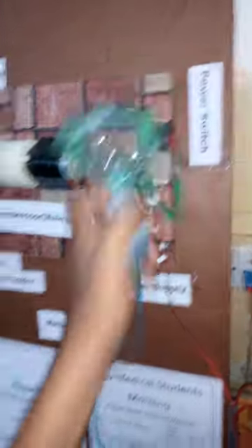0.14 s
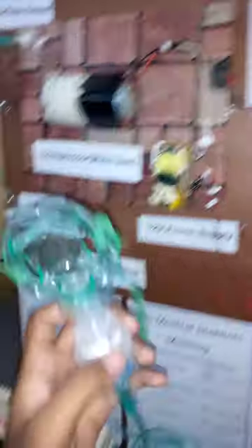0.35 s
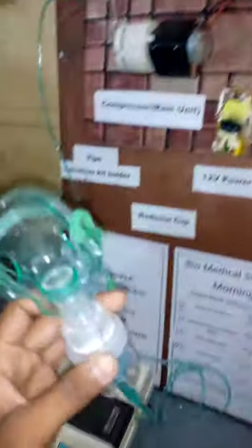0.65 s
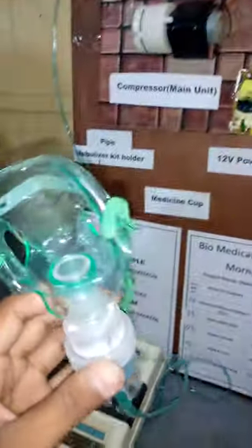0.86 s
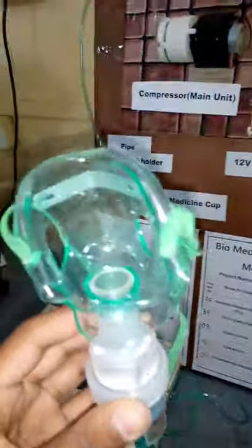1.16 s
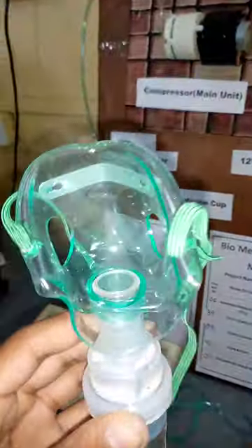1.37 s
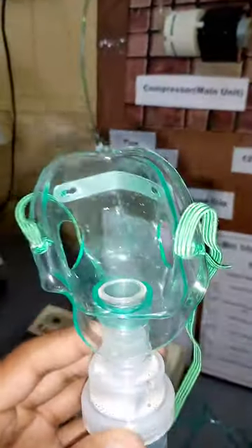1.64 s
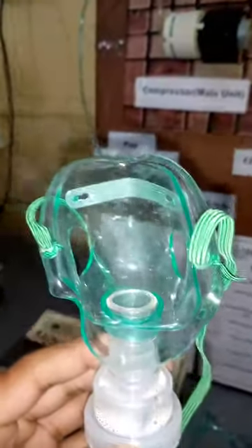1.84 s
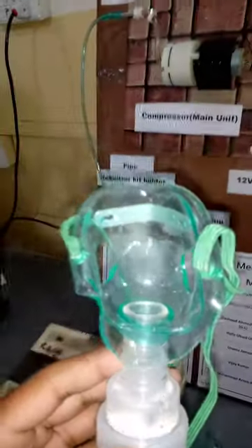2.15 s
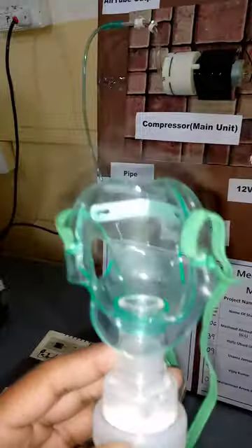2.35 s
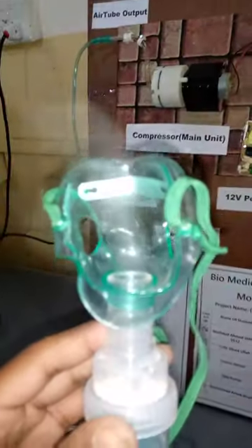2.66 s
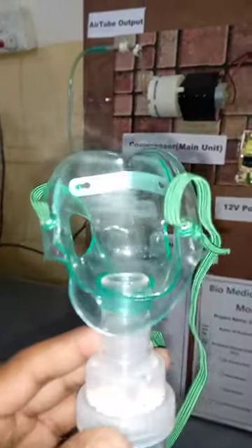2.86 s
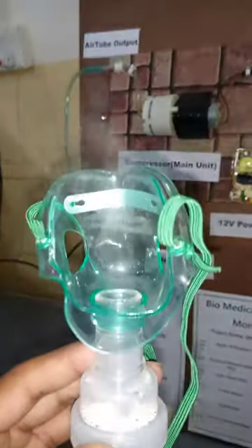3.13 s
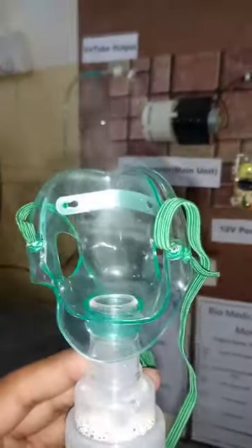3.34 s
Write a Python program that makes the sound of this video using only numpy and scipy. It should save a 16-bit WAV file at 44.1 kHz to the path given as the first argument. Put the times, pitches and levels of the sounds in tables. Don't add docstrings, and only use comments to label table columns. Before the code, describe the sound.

Close nebulizer jet, rough and spitting for the first two seconds, then smoother with only occasional falling chirps. A low buzzing diaphragm pump runs throughout behind it, recorded by one microphone with a short room tail.

```python
import sys
import numpy as np
from scipy import signal
from scipy.fft import rfft, irfft
from scipy.io import wavfile
from scipy.ndimage import uniform_filter1d

SR = 44100
rng = np.random.default_rng(int(sys.argv[2]) if len(sys.argv) > 2 else 0)


def boost_factor(decibels):
    exponent = np.asarray(decibels, float) / 20
    return 10 ** exponent


def store_wav(level_fs):
    pcm = np.round(np.clip(np.atleast_2d(level_fs), -1, 1) * 32767)
    wavfile.write(sys.argv[1], SR, pcm.T.astype(np.int16))


N = 154350
T = np.arange(N) / SR


def rms_one(x):
    return x / np.sqrt(np.mean(np.abs(x) ** 2) + 1e-20)


def in_time(rows):
    s, *columns = np.transpose(rows)
    return [np.interp(T, s, c) for c in columns]


def drift(rate_hz):
    r = np.exp(-40 * np.pi * rate_hz / SR)
    noise = rng.standard_normal(N // 20 + 4002)
    slow = signal.lfilter([1], [1, -2 * r, r * r], noise)[4000:]
    return np.interp(np.arange(N) / 20, np.arange(len(slow)), rms_one(slow))


def resonance(x, hz, width_hz):
    r = np.exp(-np.pi * width_hz / SR)
    gain = (1 - r * r) / 2
    return signal.lfilter([gain, 0, -gain], [1, -2 * r * np.cos(2 * np.pi * hz / SR), r * r], x)


def steep(x, hz, width_hz):
    return resonance(resonance(x, hz, 1.55 * width_hz), hz, 1.55 * width_hz)


def cored(hz, width_hz):
    broad = steep(rng.standard_normal(N), hz, width_hz)
    core = resonance(broad, hz, width_hz / 3)
    return rms_one(rms_one(broad) + 0.6 * rms_one(core))


def wander(x, shift_hz):
    return np.real(signal.hilbert(x) * np.exp(2j * np.pi * np.cumsum(shift_hz) / SR))


def whistle(hz, width_hz):
    r = np.exp(-np.pi * width_hz / SR)
    noise = rng.standard_normal((2, 2000))
    band = rms_one(signal.lfilter([1], [1, -2 * r, r * r], noise[0] + 1j * noise[1]))
    band = band[::-1][:len(hz)]
    even = rms_one(band / np.abs(band) ** .6)
    return np.real(even * np.exp(2j * np.pi * np.cumsum(hz) / SR))


# (multiple of shaft speed, level/dB)
SHAFT_ORDERS = [(2, -15), (3.98, -10.5), (4.98, -6.5), (5.983, 1), (8.03, -9), (9.01, -6), (13.03, -16),
                (11, -10), (13.97, -12), (15.97, -10.5), (19, -31), (3.004, -20.5), (23, -17), (25.1, -14),
                (26, -12.5), (35, -13)]


def shaft_hum(turns):
    out = np.zeros(N)
    for order, db in SHAFT_ORDERS:
        level = boost_factor(-53 + db + 0.8 * drift(2))
        out += level * np.sin(2 * np.pi * (order * turns + rng.random()))
    return np.sqrt(2) * out


# (multiple, level/dB, from t/s, to t/s)
BOARD_ORDERS = [
    (10, -57, 0.036, 0.41),
    (10, -63.5, 0.015, 4),
    (20, -56.5, 0, .45),
    (21.2, -57.5, 0, .2),
    (21.9, -60, .2, 0.86),
    (22.03, -66, 0, 4),
    (14.9, -57, 1.217, 3.6),
    (14.87, -64, .2, 1.22),
    (17.9, -60, 0.92, 4.2),
]


def board_hum(turns):
    fade_s = .07
    out = boost_factor(-76.5) * np.sin(2 * np.pi * 48.5 * T)
    for order, db, start, end in BOARD_ORDERS:
        fade = np.clip(np.minimum(T - start, end - T) / fade_s + .5, 0, 1)
        out += boost_factor(db) * fade * np.sin(2 * np.pi * order * turns)
    return np.sqrt(2) * out


# (f/Hz, level/dB per Hz)
BODY_TONE = [(30, -38), (64, -28), (80, -9), (200, -7.5), (560, -9), (1540, -17), (4600, -24), (6000, -17)]
# (f/Hz, width/Hz, level/dB)
HOUSING_RINGS = [(1270, 315, -60.5), (2362, 210, -62), (2952, 410, -54)]


def rattle(turns):
    hz, db = np.transpose(BODY_TONE)
    f = np.arange(N // 2 + 1) * SR / N + 1
    tone = boost_factor(np.interp(np.log(f), np.log(hz), db)) * (f < hz[-1])
    body = rms_one(irfft(rfft(rng.standard_normal(N)) * tone, N))
    body = boost_factor(-47.5 + 1.04 * drift(23.5)) * body
    out = body - 0.31 * resonance(body, 2080, 570)
    for ring_hz, width_hz, ring_db in HOUSING_RINGS:
        out += boost_factor(ring_db) * rms_one(steep(rng.standard_normal(N), ring_hz, width_hz))
    throb = 1 + 0.07 * (np.cos(6 * np.pi * turns) + np.cos(2 * np.pi * turns))
    return out * throb


# (t/s, turns per s)
SHAFT_SPEED = [(0, 40), (.04, 39.5), (.085, 33.6), (.14, 34.0), (.28, 35.05), (.42, 35.8), (.56, 36.05),
               (.78, 36.4), (.99, 36.4), (1.4, 36.85), (2.0, 36.95), (2.9, 36.95), (3.1, 36.6), (3.5, 36.6)]


def pump():
    turns = np.cumsum(in_time(SHAFT_SPEED)[0]) / SR
    return shaft_hum(turns) + board_hum(turns) + rattle(turns)


# (t/s, length/s, level/dB)
NOZZLE_SWELLS = [(.245, .012, 3), (.286, .026, 5), (0.337, 0.012, 5), (.372, .01, 3), (0.405, .007, -1),
                 (0.433, .025, 2), (0.463, .014, 1), (.482, .08, -10), (.568, .021, 5), (0.597, .013, 3),
                 (.645, .016, 3), (.669, .03, 2.5), (1.052, 0.036, -10), (1.153, .008, 7),
                 (1.183, 0.03, -8), (1.272, .028, -7), (1.462, .018, -5), (2.82, .08, 5), (1.303, .01, 2),
                 (1.318, .03, -7), (1.40, .016, 2), (1.63, 0.062, -6), (1.74, .052, -4), (1.793, .02, 2),
                 (0.21, .03, -7), (0, 0.066, -3), (.1, .11, -2)]


def nozzle():
    out = np.zeros(N)
    for s, length, db in NOZZLE_SWELLS:
        out[int(s * SR):int((s + length) * SR)] = db
    return uniform_filter1d(out, size=90)


# (t/s, level/dB, mask turned to the microphone/dB, froth in the cup/dB)
JET_COURSE = [(0, -44, 0, -14), (.09, -47, -5.5, -2.5), (.13, -48.5, -3.5, 3), (.27, -42.5, -2, 3),
              (.36, -40.5, -1.5, -10), (.46, -37.5, -0.5, 0), (.63, -35.5, 2.5, -2.5), (.8, -37, 3.5, -0.5),
              (1.04, -41.5, -5, -2), (1.5, -40.5, -3, 1), (1.85, -41, -0.5, -0.5), (2.24, -41, -1, -3),
              (2.45, -43.5, -0.5, -2), (2.79, -44, -1, -5.5), (3.13, -45, -1, -3), (3.5, -44, -2, -3.3)]
# (f/Hz, width/Hz, level/dB, share of turn, share of froth)
CUP_RESONANCES = [(3470, 510, -16, -0.83, .01), (5333, 370, -4.5, -0.95, .01), (5800, 175, -5, 0.042, .01),
                  (6160, 310, -9, 0.16, .01), (6700, 240, -12, -0.1, 0.06), (7300, 444, -6, 0.44, .01),
                  (7720, 266, -5.5, .99, .01), (8610, 1160, -10.5, -1.04, 0.19),
                  (10157, 600, -6, -0.56, 0.88), (11400, 2400, -23.5, -0.57, 0.54),
                  (13960, 380, -18, -0.65, 0.44), (14900, 820, -6, -0.63, 0.69),
                  (15240, 290, -11.5, 0.55, .99)]


def jet():
    flicker_hz = 25.3
    middle_from_hz, top_from_hz = 8500, 12500
    level_db, turn_db, froth_db = in_time(JET_COURSE)
    shared_db = 0.5 * drift(flicker_hz) - 11 * np.exp(-((T - .274) / .008) ** 4)
    restless = .4 + .6 * np.exp(-(T / 1.5) ** 2)
    film, top_db = closed(), nozzle()
    tipped = -.04 * np.clip((.24 - T) / .07, 0, 1)
    out = np.zeros(N)
    for hz, width_hz, db, turn, froth in CUP_RESONANCES:
        middle = middle_from_hz < hz < top_from_hz
        flicker_db = 2.5 * (hz / 6000) ** np.log2(1.54)
        band_db = db + turn * turn_db + froth * froth_db + shared_db
        band_db = band_db + restless * flicker_db * drift(flicker_hz)
        band_db = band_db + film * (-9 * middle + 3.5 * (hz < 4000))
        band_db = band_db + top_db * (hz > top_from_hz)
        shift_hz = hz * (.005 * drift(6) + tipped * middle)
        out += boost_factor(band_db) * wander(cored(hz, width_hz), shift_hz)
    return boost_factor(level_db) * out


# (t/s, peak level/dB, start f/Hz)
FILM_BURSTS = [(.061, -28, 5800), (.244, -42, 9000), (.277, -27.5, 3270), (.283, -30, 5120),
               (.334, -18.5, 8660), (0.369, -17.5, 7850), (0.4, -14.5, 7300), (.411, -18, 7370),
               (0.423, -19, 6220), (.457, -30, 9850), (.779, -25, 7600), (0.818, -15.5, 7530),
               (0.645, -25, 9560), (1.075, -27, 6100), (1.205, -22, 5630), (1.285, -19, 6760),
               (1.330, -27, 8030), (1.479, -17.5, 8460), (1.597, -22.5, 5650), (1.634, -17, 5270),
               (1.679, -21, 6700)]


def bursts(out):
    length_s, top_hz = .007, 11500
    u = np.arange(int(length_s * SR)) / SR / length_s
    shape = np.clip(u / 0.035, 0, 1) * (1 - u) ** 1.1
    for s, db, hz in FILM_BURSTS:
        path = hz * (top_hz / hz) ** u ** 2.2
        i = int(s * SR)
        out[i:i + len(u)] += boost_factor(db - 6.5) * shape * whistle(path, 800)


# (t/s, peak level/dB, f/Hz, length/s)
DROP_FLARES = [(0.23, -25, 6800, 0.022), (0.364, -29, 6048, 0.0047), (0.44, -21, 7600, .007),
               (0.46, -9, 8160, 0.0089), (0.51, -12, 7380, 0.016), (0.52, -11, 7700, 0.014),
               (0.557, -9, 8480, 0.0096), (.585, -20, 7600, 0.017), (0.57, -11.5, 8450, 0.017),
               (0.728, -11, 7380, 0.0057), (0.27, -29, 6700, 0.0089), (1.06, -26, 4750, .025),
               (1.192, -26, 4750, 0.024), (.54, -26, 4800, 0.022), (1.5, -16, 7300, 0.0052),
               (1.67, -22, 5900, .006), (1.784, -22.5, 5500, .007), (1.79, -30, 10000, .006),
               (0.47, -18, 8500, 0.0085), (.135, -33, 9700, .014), (0.29, -33, 11000, .008),
               (1.65, -29, 10200, .01), (0.071, -32, 5800, .012), (0.072, -30, 5500, .012),
               (.38, -25, 6800, .01), (0.278, -17, 4960, 0.01), (1.315, -16.5, 6700, 0.016),
               (1.428, -25.5, 10000, 0.011), (1.073, -18.5, 6400, 0.0076)]


def flares(out):
    for s, db, hz, length in DROP_FLARES:
        u = np.arange(int(length * SR)) / SR / length
        i = int(s * SR)
        out[i:i + len(u)] += boost_factor(db - 10) * np.sin(np.pi * u ** 0.78) * whistle(hz + 0 * u, 480)


# (t/s, f/Hz)
FALL_START = [(0, 9180), (.7, 9620), (1.0, 13000), (1.35, 13000), (1.6, 9500), (2.1, 10500), (3.5, 11060)]
# (t/s, peak level/dB, end f/Hz, length/s)
FILM_FALLS = [(0.219, -21, 7300, .028), (0.256, -23.5, 5800, 0.01), (0.319, -19, 6600, 0.0099),
              (0.345, -18, 5510, 0.017), (0.38, -24, 7540, .010), (0.516, -20.5, 5800, .028),
              (0.543, -34, 5700, .010), (0.615, -14.5, 5910, 0.021), (0.637, -31, 6000, .015),
              (0.725, -18.5, 5290, .018), (0.774, -15.5, 7300, .016), (0.808, -16.5, 7300, .018),
              (1.021, -18.5, 7430, 0.0087), (1.047, -19.5, 6400, 0.011), (1.178, -18.5, 5410, 0.021),
              (1.268, -20, 5620, .018), (1.312, -23.5, 6700, .012), (1.453, -18, 5460, 0.021),
              (1.618, -17.5, 5640, .014), (1.658, -17, 5730, .015), (1.757, -18.5, 5700, .025),
              (2.147, -19.5, 6800, 0.017), (2.193, -22, 7200, .012), (2.231, -27, 7500, .010),
              (2.637, -22.5, 7000, .022), (2.893, -31.5, 9060, 0.026), (2.906, -25.5, 6980, 0.0208),
              (3.042, -22.5, 5880, 0.016)]


def falls(out):
    lead_s, rise_s = .001, .0035
    for s, db, hz, length in FILM_FALLS:
        u = np.arange(int((lead_s + 1.5 * length) * SR)) / SR
        shape = np.clip(u / rise_s, 0, 1) * np.clip((u[-1] - u) / length, 0, 1)
        start_hz = np.interp(s, *np.transpose(FALL_START))
        path = hz * (start_hz / hz) ** np.exp(-u / (.0032 + .1 * length))
        spray = boost_factor(-8.5) * whistle(7500 + 0 * u, 4500)
        i = int((s - lead_s) * SR)
        out[i:i + len(u)] += boost_factor(db - 11.5) * shape * (whistle(path, 1050) + spray)


def closed():
    out = np.zeros(N)
    for s, _, _, length in FILM_FALLS:
        out[int((s + .004) * SR):int((s + 1.3 * length) * SR)] = 1
    return uniform_filter1d(out, size=200)


def sputters():
    out = np.zeros(N)
    bursts(out)
    flares(out)
    falls(out)
    rung = np.zeros(N)
    for k, (hz, width_hz, db, _, _) in enumerate(CUP_RESONANCES):
        rung += (-1) ** k * boost_factor(db) * resonance(out, hz, width_hz)
    soft = signal.sosfilt(signal.butter(1, [4300, 13000], "band", fs=SR, output="sos"), out)
    return boost_factor(-1.5) * soft + boost_factor(11) * rung


def room(x):
    t60_s = 0.18
    t = np.arange(SR // 4) / SR
    tail = rng.standard_normal(len(t)) * boost_factor(-60 * t / t60_s) * (t > .003)
    return signal.fftconvolve(x, tail / np.sqrt(np.sum(tail ** 2)))[:N]


def scene():
    spit = sputters()
    hiss = boost_factor(-69) * rng.standard_normal(N)
    mono = pump() + jet() + spit + boost_factor(-12) * room(spit) + hiss
    return np.array([mono, mono])


def top_cut(x):
    return signal.sosfilt(signal.butter(12, 16750, fs=SR, output="sos"), x)


def record(dry):
    cut = signal.sosfilt(signal.ellip(14, .5, 80, 15850, fs=SR, output="sos"), dry)
    return top_cut(cut)


dry = scene()
out = record(dry)
store_wav(out)
```